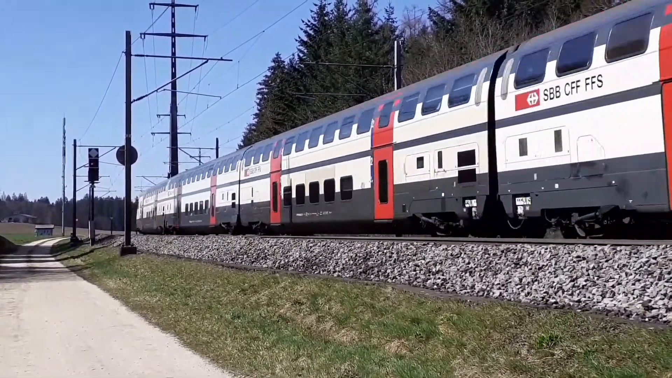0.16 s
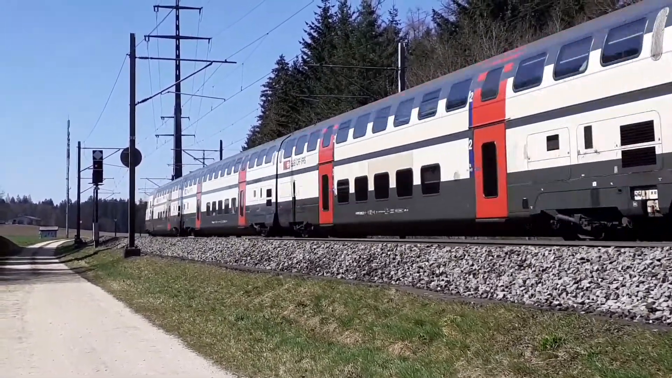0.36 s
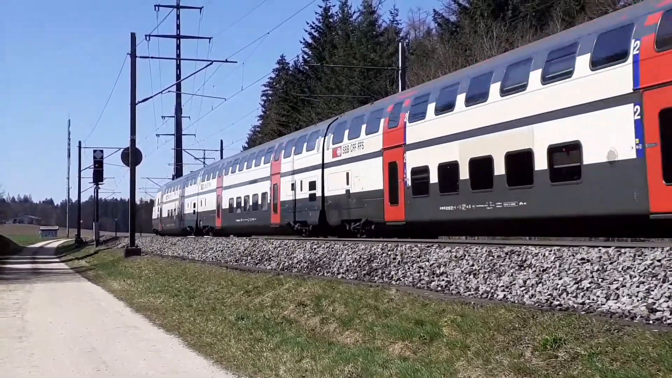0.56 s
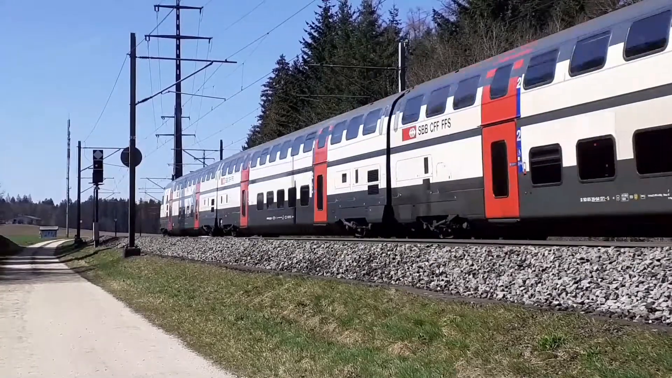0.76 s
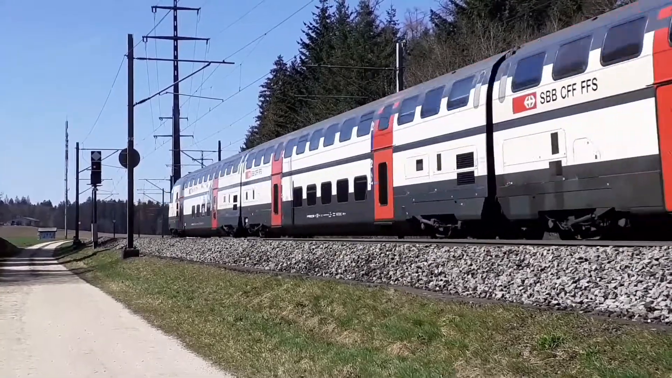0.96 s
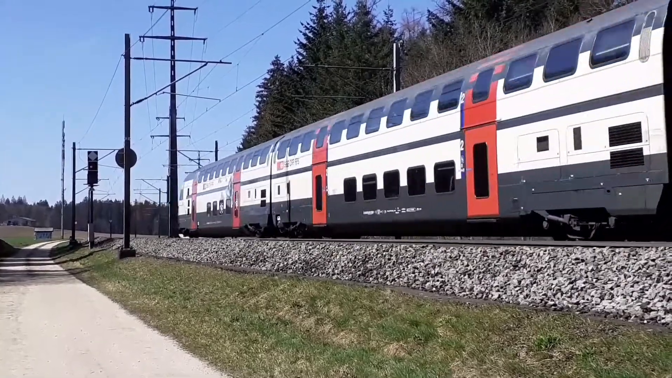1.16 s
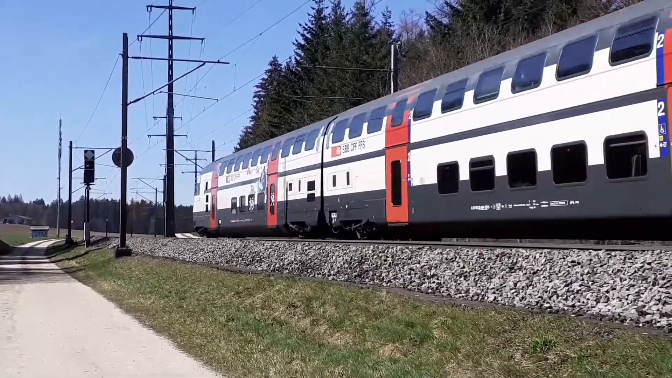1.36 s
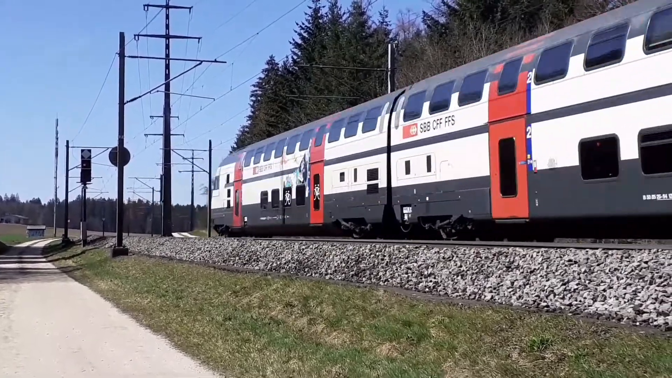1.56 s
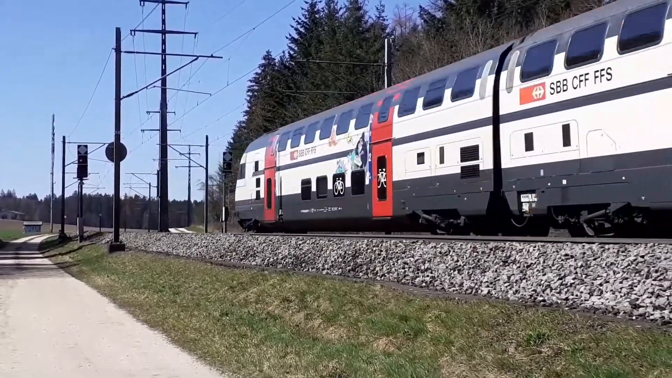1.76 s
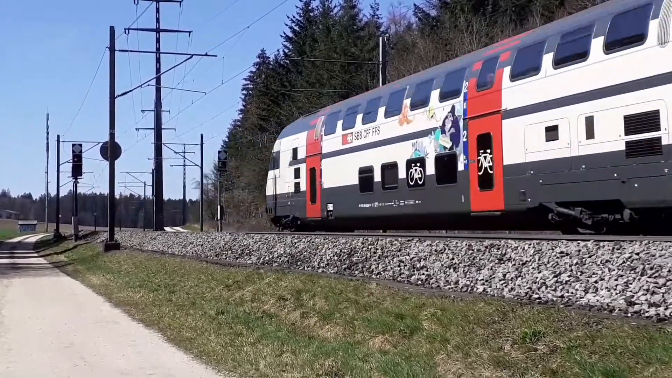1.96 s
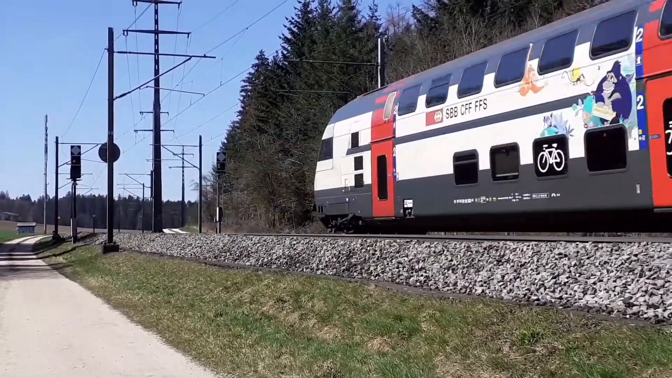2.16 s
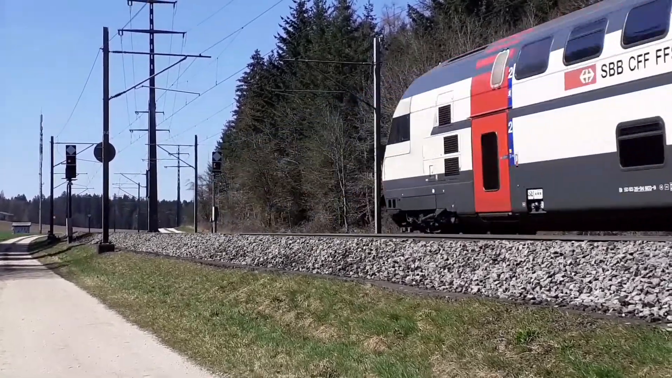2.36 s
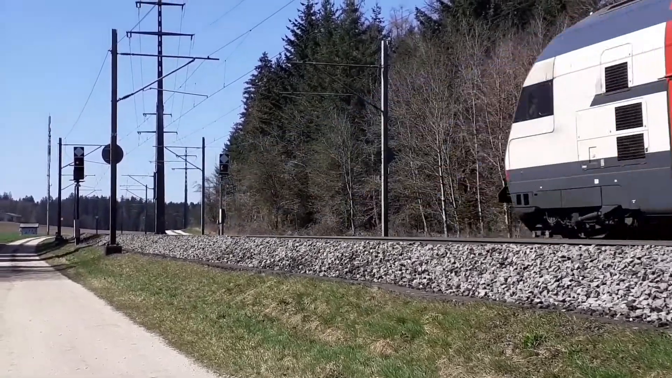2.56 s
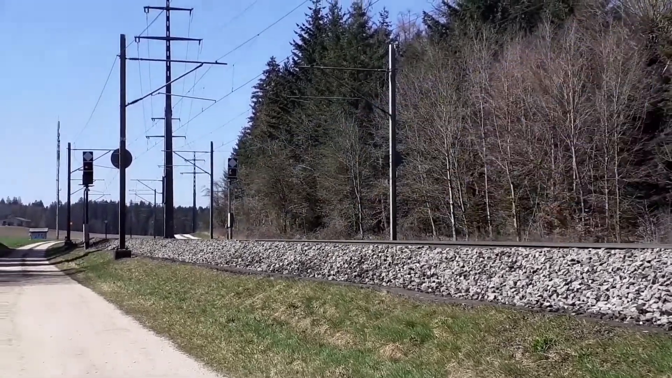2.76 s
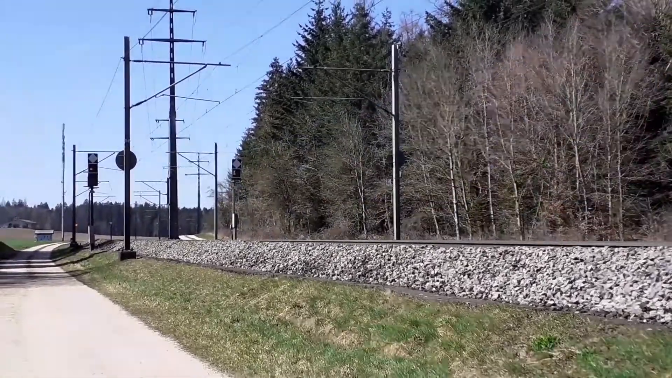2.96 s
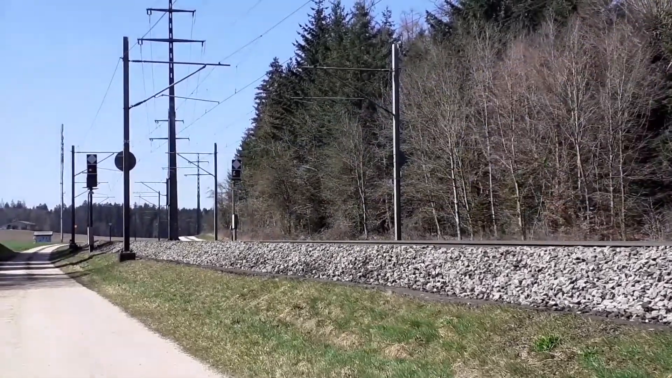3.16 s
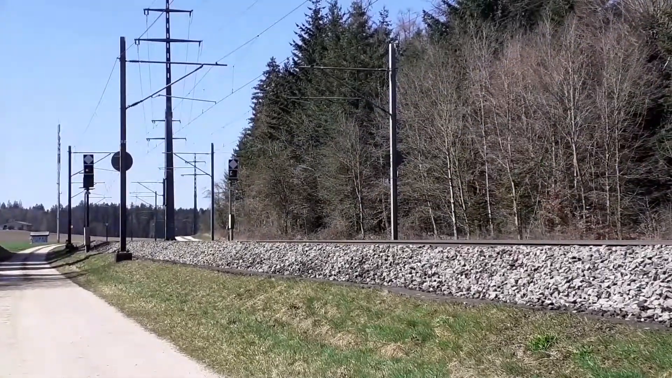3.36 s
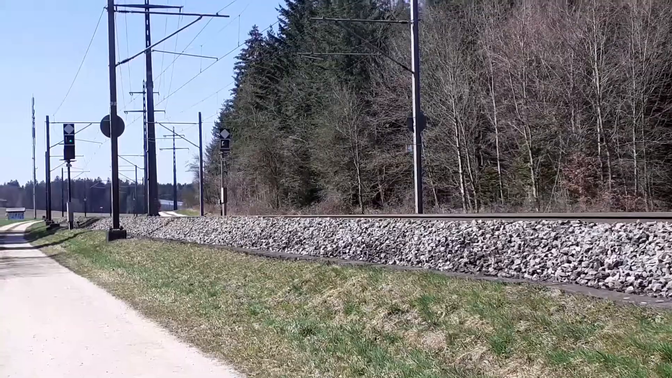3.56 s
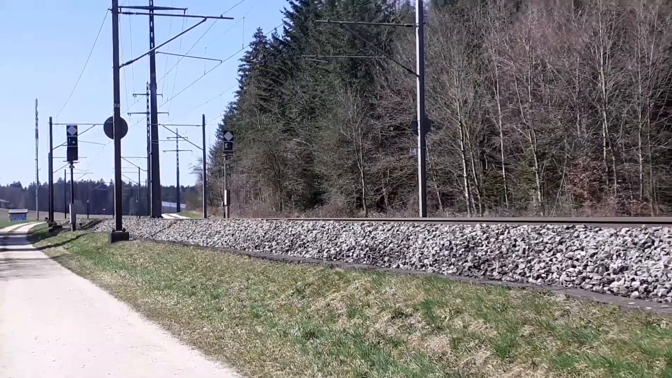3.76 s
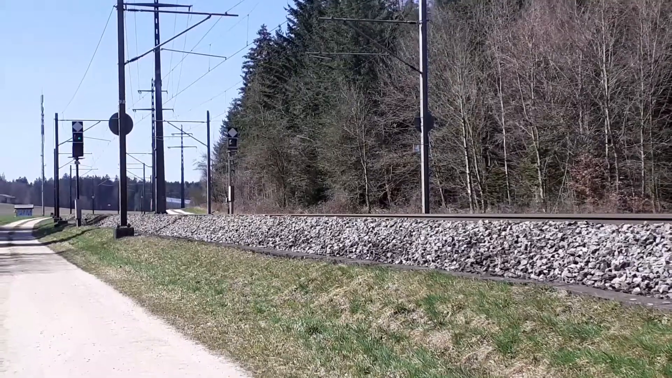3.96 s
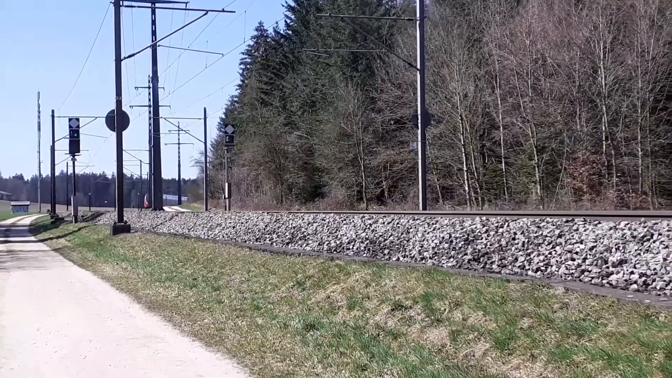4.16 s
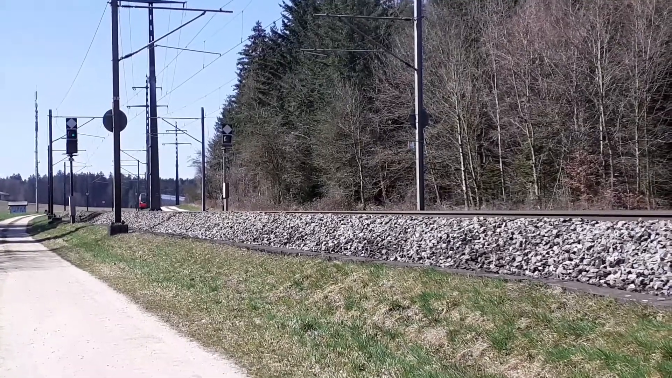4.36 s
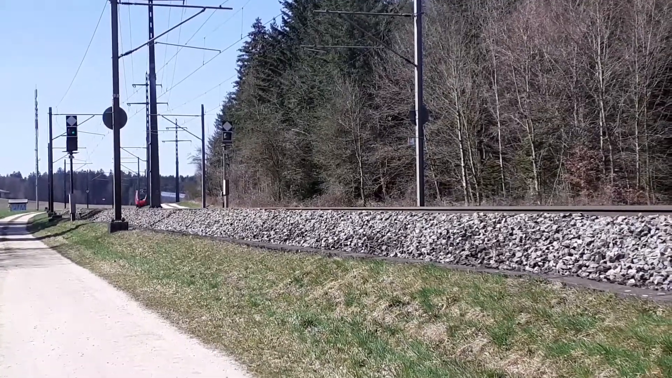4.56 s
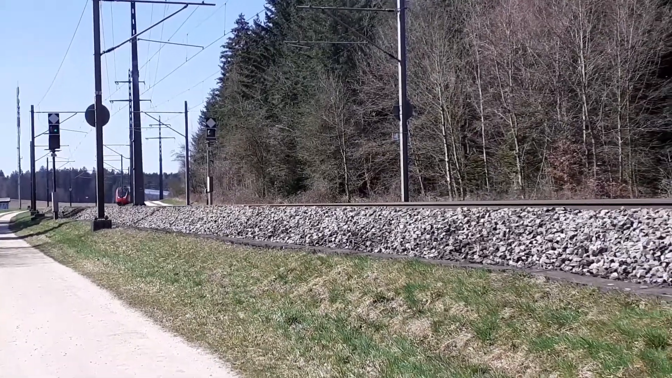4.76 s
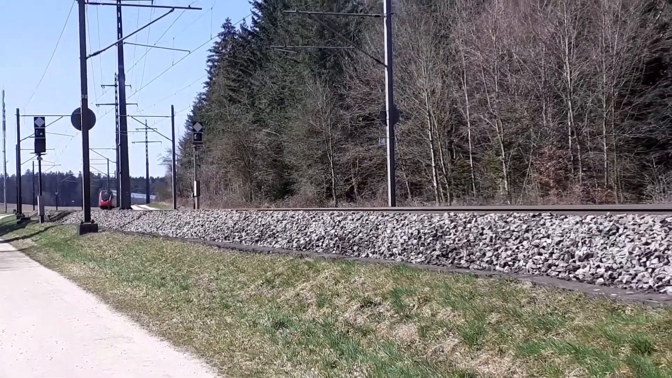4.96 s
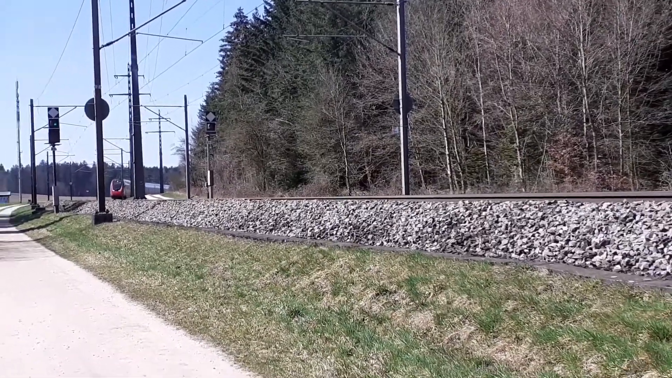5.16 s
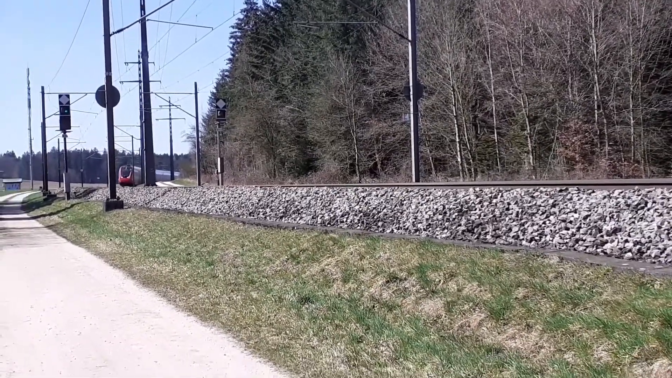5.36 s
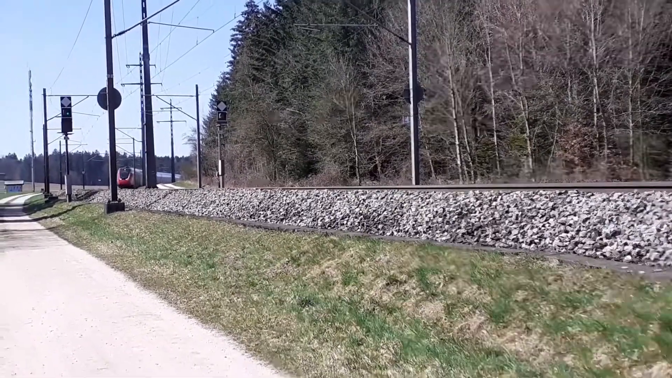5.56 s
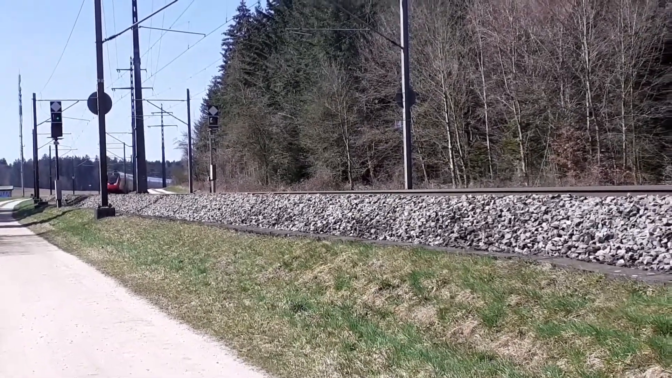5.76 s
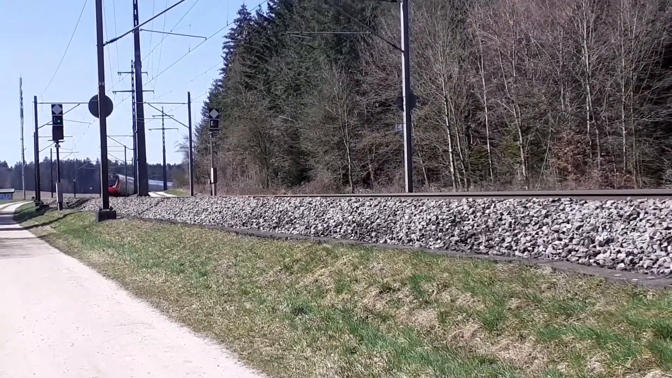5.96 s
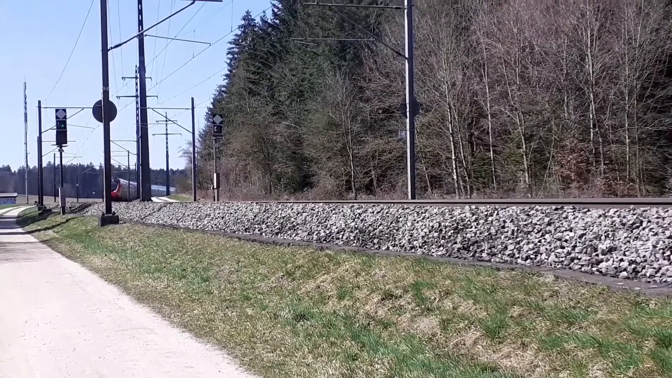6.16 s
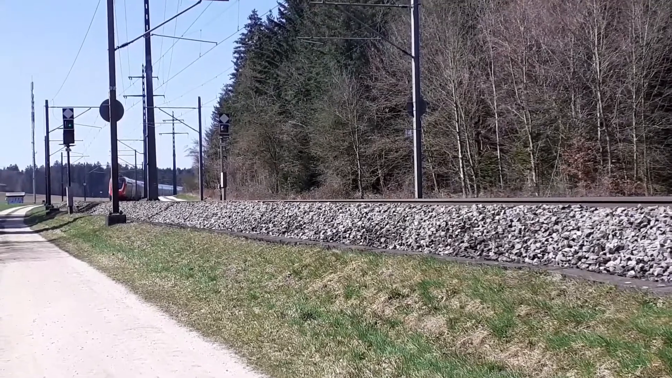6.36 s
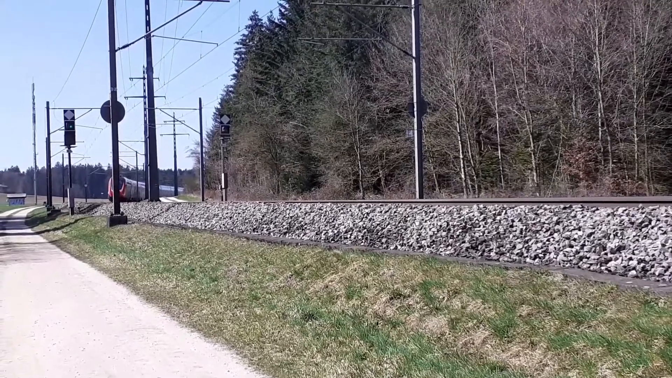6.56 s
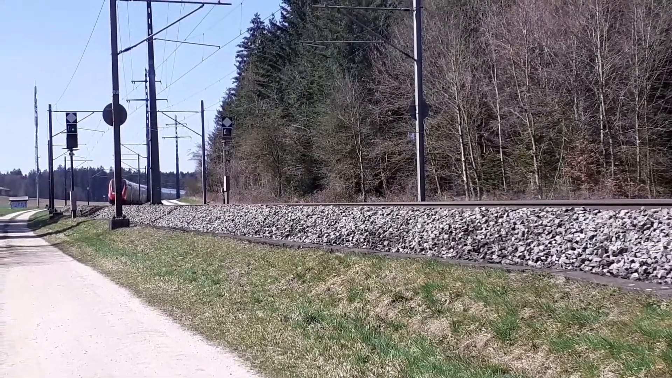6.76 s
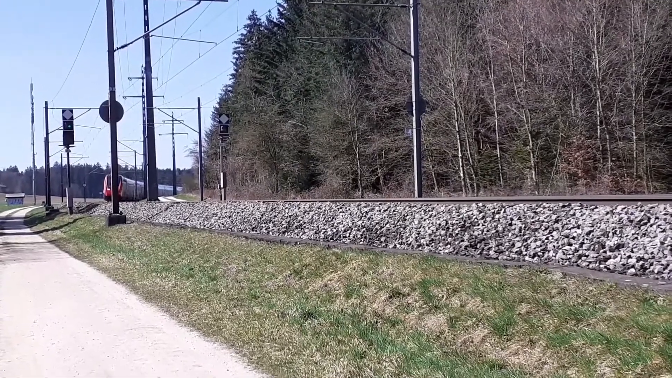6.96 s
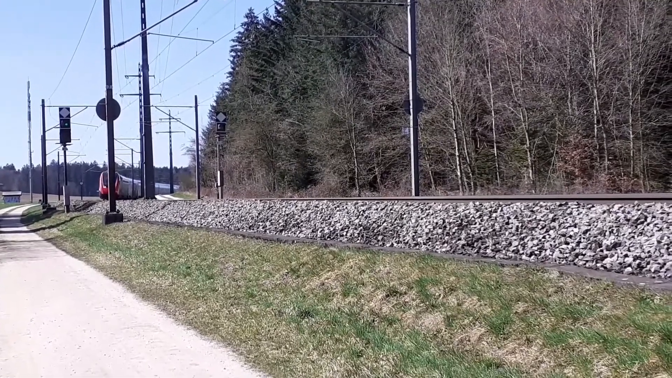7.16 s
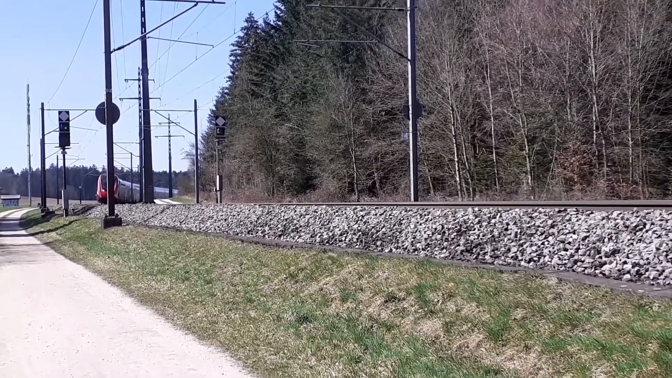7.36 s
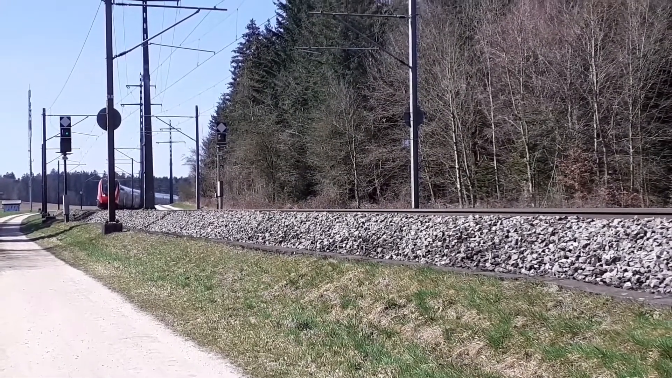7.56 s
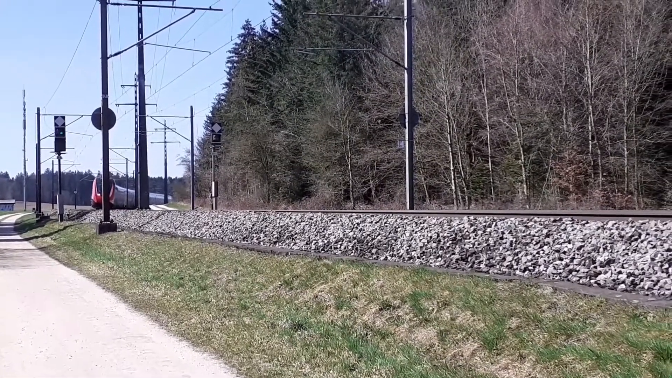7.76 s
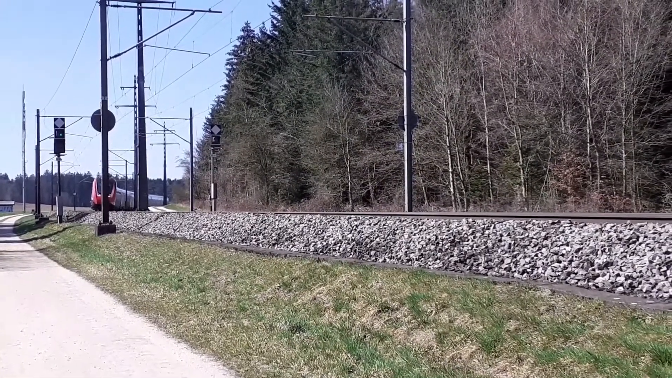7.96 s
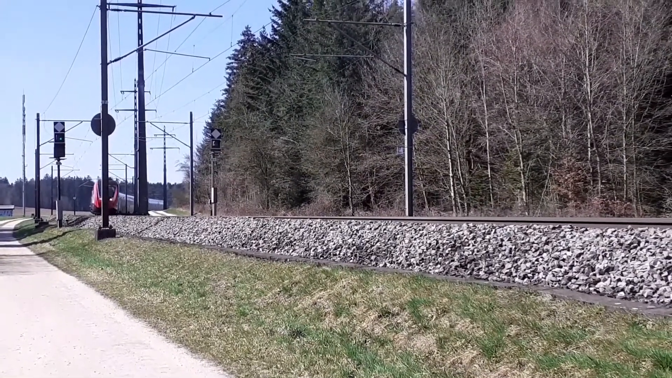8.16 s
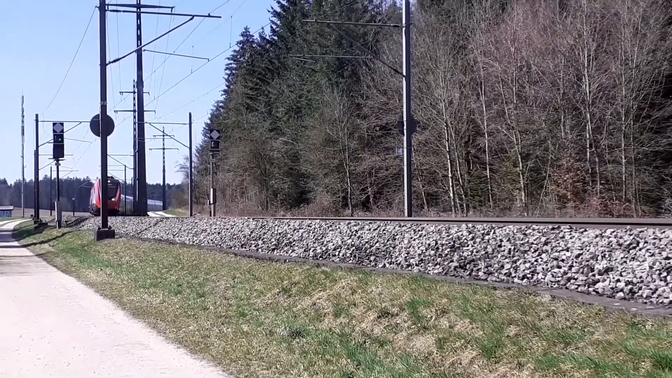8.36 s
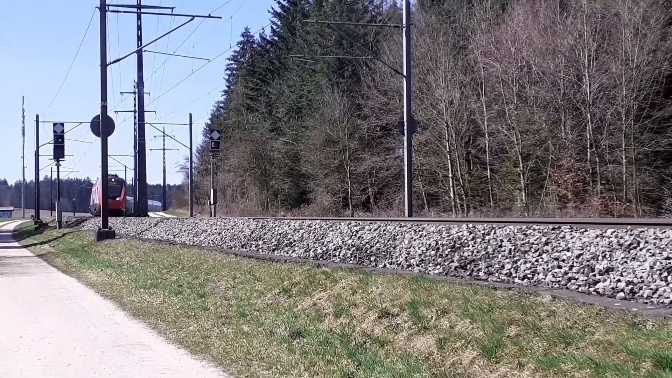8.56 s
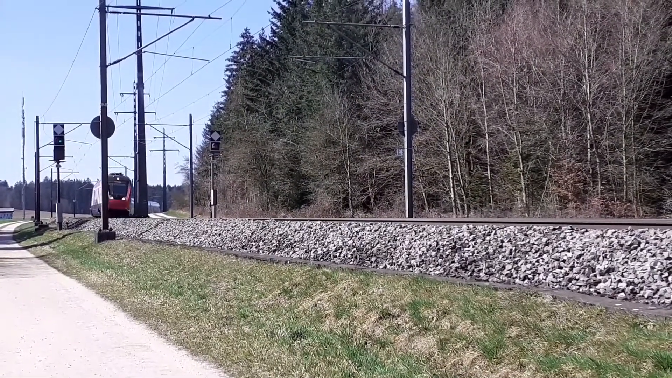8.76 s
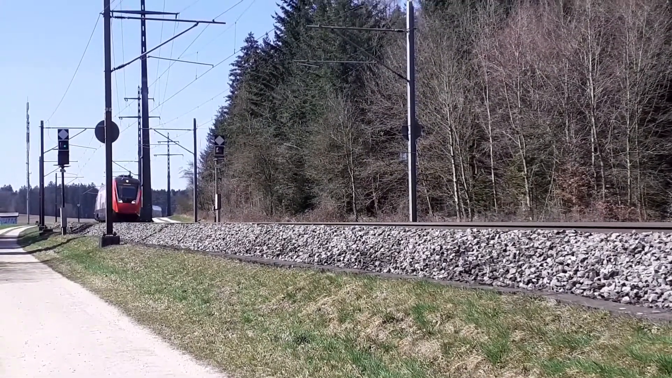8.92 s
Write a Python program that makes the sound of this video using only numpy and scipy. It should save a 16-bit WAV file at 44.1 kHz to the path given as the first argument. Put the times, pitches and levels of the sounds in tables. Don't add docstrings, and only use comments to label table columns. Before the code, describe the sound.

A fast passenger train roars past very close with ringing, squealing wheels, then abruptly cuts to quiet birdsong by a wood while another train slowly grows.

```python
import sys
import numpy as np
from scipy import signal
from scipy.fft import rfft, irfft
from scipy.io import wavfile

SR = 44100
rng = np.random.default_rng(int(sys.argv[2]) if len(sys.argv) > 2 else 0)


def waveform_to_disk(signal):
    frames = np.transpose(np.atleast_2d(signal))
    scaled = np.clip(frames, -1, 1) * 32767
    samples = np.round(scaled).astype(np.int16)
    wavfile.write(sys.argv[1], SR, samples)


def attenuation_scalar(level_db):
    decades = np.asarray(level_db, float) / 20
    return 10 ** decades


N = 400869
PASS_N = int(3.41 * SR)
LEFT_RIGHT = np.array([[1], [-1]])


def in_time(rows):
    s, *columns = np.transpose(rows)
    return [np.interp(np.arange(N) / SR, s, c) for c in columns]


def at_hz(points, hz):
    points = np.array(points)
    return np.interp(np.log(hz), np.log(points[:, 0]), points[:, 1])


def drift(rate_hz, size):
    r = np.exp(-40 * np.pi * rate_hz / SR)
    white = rng.standard_normal(size // 20 + 2002)
    slow = signal.lfilter([1], [1, -2 * r, r * r], white)[1000:]
    return np.interp(np.arange(size) / 20, np.arange(len(slow)), slow / slow.std())


def field(size, spectrum, balance, likeness, splits_hz, levels_db, patchy_db, lag_s):
    ruling_db, lag_wander = 4, .12
    out = np.zeros((2, size))
    edges = 24 * 2 ** np.arange(0, 9.5, 1 / 3)
    centres = np.sqrt(edges[1:] * edges[:-1])
    group = np.searchsorted(splits_hz, centres)
    weight = attenuation_scalar(at_hz(spectrum, centres))
    power = weight ** 2 * np.diff(edges)
    white, together = rng.standard_normal((2, 2, size)), drift(6, size)
    for k, hz in enumerate(centres):
        band = signal.butter(2, edges[k:k + 2], "band", fs=SR, output="sos")
        mid, side = signal.sosfilt(band, white[k % 2])
        share = weight[k] / np.sqrt(np.sum(power[group == group[k]]) * 2 / SR)
        own = drift(12, size)
        unlike = (1 - at_hz(likeness, hz)) * attenuation_scalar(ruling_db * (together - own))
        alike = np.clip(1 - unlike, 0, 1)
        gain = share * attenuation_scalar(levels_db[group[k]] + patchy_db * (0.25 * together + own))
        pair = np.sqrt(.5 + alike / 2) * mid + np.sqrt(.5 - alike / 2) * side * LEFT_RIGHT
        lag = round(lag_s * SR) * (1 + (lag_wander * together if hz < 2500 else 0))
        pair[0] = np.interp(np.arange(size) - lag, np.arange(size), pair[0])
        out += gain * pair * attenuation_scalar(at_hz(balance, hz) / 2 * LEFT_RIGHT)
    return out


def add(out, start, sound, pan_db, lag_s):
    for port, shift, db in zip(out, [round(lag_s * SR), 0], [pan_db / 2, -pan_db / 2]):
        at = np.arange(len(sound)) + start + shift
        inside = (at >= 0) & (at < len(port))
        port[at[inside]] += attenuation_scalar(db) * sound[inside]


def tone(rows, rough, rate_hz):
    s, hz, db = np.transpose(rows)
    start = round(s[0] * SR)
    t = np.arange(start, round(s[-1] * SR)) / SR
    chance = drift(rate_hz, len(t)) + 1j * drift(rate_hz, len(t))
    waver = np.sqrt(1 - rough) + np.sqrt(rough / 2) * chance
    edge = np.clip(np.minimum(t - s[0], s[-1] - t) / 0.0053, 0, 1)
    turn = np.exp(2j * np.pi * np.cumsum(np.interp(t, s, hz)) / SR)
    return start, np.sqrt(2) * edge * attenuation_scalar(np.interp(t, s, db)) * np.real(waver * turn)


def notch(x, hz, width_hz, db):
    bins_hz = np.arange(N // 2 + 1) * SR / N
    return irfft(rfft(x) * attenuation_scalar(db * np.exp(-((bins_hz - hz) / width_hz) ** 4)), N)


def swell(rows, attack_s, release_s):
    power = 0
    for s, long_s, db in rows:
        end = s + long_s
        shape = [(s - 2 * attack_s, -120), (s - attack_s, db - 16), (s, db), (end, db - 5.5),
                 (end + release_s, db - 21.5), (end + 2 * release_s, -120)]
        power = power + attenuation_scalar(2 * in_time(shape)[0])
    return power


def plus(level_db, power, db):
    return 10 * np.log10(attenuation_scalar(2 * level_db) + power * attenuation_scalar(2 * db))


def narrow(power, low_hz, high_hz, pan_db):
    sos = signal.butter(3, [low_hz, high_hz], "band", fs=SR, output="sos")
    band = signal.sosfilt(sos, rng.standard_normal((2, N)))
    level_db = 3.0 + 0.43 * drift(14.0, N) + pan_db / 2 * LEFT_RIGHT
    return band / band.std() * np.sqrt(power) * attenuation_scalar(level_db)


SPEED_MS, DISTANCE_M = 25, 5
LEFT_LAG_S = .00046

# (frequency [Hz], density [dB per Hz])
ROAR_SPECTRUM = [(15, -40), (25, -8.5), (91, 3), (169, -9), (471, -7.5), (1080, -9), (2010, -15.5),
                 (3180, -11.5), (4280, -7.5), (5450, -13.5), (6590, -15), (9350, -25), (11000, -17.5),
                 (13300, -27.5), (15600, -49)]
# (frequency [Hz], left minus right [dB])
PASS_BALANCE = [(60, 1), (150, 0.5), (380, 1), (950, 1.5), (2380, -2.0), (5980, -11.5), (15000, -26.5)]
# (frequency [Hz], likeness [0-1])
PASS_LIKENESS = [(40, .93), (300, .88), (600, .7), (850, .9), (1150, .94), (1500, .8), (2500, .45),
                 (5000, .45), (9000, .25), (15000, .05)]
# (time [s], half width [s], hiss rise [dB], top hiss rise [dB])
RUSHES = [
    (0.05, 0.16, 5, 4.5),
    (.72, 0.36, 8, 6.5),
    (1.5, 0.34, 6, 5),
    (2.4, 0.31, 5, 3.5),
    (3.12, 0.21, 3.5, 5),
]


def roar():
    t = np.arange(PASS_N) / SR
    hiss_db, top_db = sum(np.outer(db, np.exp(-((t - s) / half_s) ** 2)) for s, half_s, *db in RUSHES)
    rumble_db, rail_db = -31.5 + 0.15 * hiss_db, -32 + 0.28 * hiss_db
    return field(PASS_N, ROAR_SPECTRUM, PASS_BALANCE, PASS_LIKENESS, [600, 3000, 7500],
                 [rumble_db, rail_db, -34 + hiss_db, -51 + top_db], patchy_db=1.8, lag_s=LEFT_LAG_S)


def add_ring(out, rows, rough, rate_hz):
    apart = 0.27
    pan_db = at_hz(PASS_BALANCE, rows[0][1])
    add(out, *tone(rows, rough, rate_hz), pan_db + 10 * np.log10(1 - apart), LEFT_LAG_S)
    reflected = rows + [0, 0, 10 * np.log10(apart + 1e-3)]
    add(out[:1], *tone(reflected, 1, rate_hz), pan_db, LEFT_LAG_S)


def doppler(along_m):
    return 1 - SPEED_MS / 343 * along_m / np.hypot(along_m, DISTANCE_M)


# (frequency at rest [Hz], width [Hz], level [dB])
WHEEL_MODES = [(256.6, 30, -44), (472.2, 30, -43), (1600, 320, -39.5), (1978, 78, -44), (2185, 110, -39.5),
               (3600, 52, -45.5), (4360, 170, -36), (6540, 270, -41), (8900, 90, -50.5), (10840, 200, -52),
               (12600, 260, -59.5)]
# (time nearest [s], low modes [dB], high modes [dB])
CAR_ENDS = [
    (0.099, -1, -2.5),
    (.82, 1, -3.5),
    (1.598, -0.5, 0),
    (2.38, -2, -2.5),
    (3.199, 0.5, -8),
]


def wheels():
    out, t = np.zeros((2, PASS_N)), np.linspace(-.5, .5, 31)
    along_m = SPEED_MS * t
    beam = 2.7
    fall_db = -20 * beam * np.log10(np.hypot(along_m, DISTANCE_M) / DISTANCE_M)
    for nearest_s, low_db, high_db in CAR_ENDS:
        for axle_s in [-.2, -.11, 0.13, 0.16]:
            for hz, width_hz, db in WHEEL_MODES:
                broken_db = 4.12 * rng.standard_normal(len(t))
                level_db = db + fall_db + broken_db + (low_db if hz < 3000 else high_db)
                pitch_hz = hz * (1 + .015 * rng.standard_normal()) * doppler(along_m)
                rows = np.transpose([nearest_s + axle_s + t, pitch_hz, level_db])
                add_ring(out, rows, 0.99, width_hz)
    return out


def squeal(s, hz, db, half_s, way_m):
    t = np.linspace(-2, 2, 17) * half_s
    shift = doppler(SPEED_MS * t - way_m)
    return np.transpose([s + t, hz * shift / shift[8], db - 13.5 * np.abs(t) / half_s])


# (time loudest [s], pitch [Hz], level [dB], half length [s], way to nearest point [m])
SQUEALS = [(.55, 4690, -28, 0.06, 11), (.69, 4680, -25.5, 0.055, 12), (.85, 4670, -34, 0.13, 12.5),
           (1.0, 4650, -25.5, 0.066, 12), (1.25, 4570, -24, 0.081, 8.5), (1.45, 4300, -20.5, 0.093, 3.5),
           (1.57, 4190, -16.5, 0.084, -3.5), (1.69, 4130, -17.5, 0.068, -9), (1.79, 4100, -37, 0.05, -7.5),
           (1.96, 4600, -27.5, .09, 12), (2.17, 4560, -31.5, 0.074, 7), (2.274, 2132, -25, .04, 3.5),
           (2.4, 2090, -27.5, 0.11, -6.5), (2.575, 4115, -27, 0.026, -3.5),
           (3.182, 4170, -19.5, 0.035, -2.5), (3.271, 4170, -26.5, .03, -6.5),
           (3.32, 4130, -30.5, .025, -1), (3.05, 4310, -31, .06, 6), (2.52, 4650, -32, .04, 11),
           (2.85, 4550, -33, .05, 9), (2.68, 4060, -33, .04, -9), (.25, 4120, -30, .04, -8),
           (.05, 4300, -31, .05, 4)]
# (time loudest [s], pitch [Hz], level [dB], half length [s], way to nearest point [m])
SHRILL = [(0.159, 6350, -28.5, .12, 2), (.75, 10800, -49, .08, 1), (0.824, 7940, -26, .025, 9.5),
          (.98, 12800, -49, .07, 3), (1.155, 11300, -48, .06, 2.5), (1.368, 11000, -39.5, .05, 4.5),
          (1.416, 6450, -34.5, .07, 3), (1.652, 8300, -37, .04, 2.5), (1.78, 12600, -48, .08, -8),
          (2.315, 6340, -25.5, .08, 1), (2.471, 6200, -24.5, .08, -3.5), (2.996, 6550, -35.5, .06, 0.5),
          (3.14, 6430, -29.5, .04, 2), (3.29, 6187, -23, .09, -5), (3.093, 10650, -39.5, .06, 1),
          (3.179, 10620, -38, .1, 2), (3.25, 8330, -42, .1, 2.5), (.62, 7750, -36, .03, 9),
          (.96, 7700, -38, .015, 9), (1.77, 6250, -33, .04, -7), (2.17, 6600, -37, .04, 6),
          (2.585, 6220, -32, .025, 0), (2.93, 6720, -39, .03, 3), (2.33, 8420, -40, .04, 6),
          (2.65, 10400, -46, .06, -4), (2.42, 10800, -46, .05, 4)]
# (time loudest [s], pitch [Hz], level [dB], half length [s], way to nearest point [m])
CHORUS = [(.08, 2090, -28, .12, 10.5), (.64, 4240, -27, .1, 10), (.85, 4210, -28.5, .15, 11.5),
          (1.04, 4200, -26.5, .08, -4.5), (.85, 2100, -30, .12, 6), (2.55, 2050, -31.5, .08, -6),
          (3.14, 2000, -27, .06, -6.5), (3.25, 1900, -28.5, .07, -4.5), (3.251, 1580, -28.5, 0.12, -5),
          (2.22, 4400, -38, 0.11, 6), (0.54, 6300, -42, 0.093, 7), (1.03, 6350, -38, 0.11, 8),
          (2.1, 6250, -40, 0.06, -6), (.38, 4600, -34, .15, 14), (.3, 4180, -33, .15, -12),
          (.2, 10700, -50, .2, 10), (.8, 10750, -48, .25, 10), (1.8, 10600, -48, .15, -9),
          (2.47, 4200, -30, .08, -6), (2.92, 4420, -34, .1, 7), (1.6, 6200, -35, .1, -6),
          (1.67, 2100, -29, .08, 4)]


def squeals():
    out = np.zeros((2, PASS_N))
    for table, rough, rate_hz in [(SQUEALS, .5, 45), (SHRILL, .5, 45), (CHORUS, 1, 130)]:
        for row in table:
            add_ring(out, squeal(*row), rough, rate_hz)
    return out


def passing():
    return np.pad(roar() + wheels() + squeals(), ((0, 0), (0, N - PASS_N)))


# (time [s], level [dB])
APPROACH = [(3.42, -0.5), (4.5, 1.64), (5.6, 3.5), (6.6, 4.5), (7.3, 8.5), (8.0, 11.5), (9.09, 15.5)]


def approach_db():
    return in_time(APPROACH)[0]


# (time [s], length [s], level [dB])
ROAD_SWELLS = [
    (4.686, .62, -60),
    (5.726, 0.066, -62.5),
]


def road_power():
    return swell(ROAD_SWELLS, attack_s=.06, release_s=0.18)


# (frequency [Hz], density [dB per Hz])
FAR_SPECTRUM = [(15, -50), (25, -18), (46, 0), (80, 14), (99, -7.5), (119, -15), (260, -21), (458, -26.5),
                (686, -23.5), (1860, -26), (6590, -38), (7540, -31), (9350, -52.5), (12200, -31.5),
                (15600, -42.5)]
# (frequency [Hz], left minus right [dB])
FAR_BALANCE = [(60, 2), (180, 2.5), (550, 2.5), (1650, -0.5), (4970, -4.5), (15000, -2)]
# (frequency [Hz], likeness [0-1])
FAR_LIKENESS = [(60, 0.8), (180, 0.78), (550, 0.58), (1650, 0.16), (4970, 0.4), (15000, 0.48)]
# (time [s], level [dB])
WIND = [(3.42, -59), (4.33, -60), (4.84, -62), (5.16, -57), (6.92, -55), (7.31, -49), (7.98, -49),
        (8.19, -44), (8.49, -50), (9.09, -45.5)]
# (time [s], length [s], level [dB])
BREEZES = [
    (4.46, .1, -67),
    (7.2, .1, -70.5),
    (7.78, .25, -64.5),
]
# (time [s], share [0-1])
DIP_GROWS = [
    (4.4, .35),
    (5.2, .85),
    (7, 1),
]


def wind_and_far_train():
    start = int(3.3 * SR)
    (wind_db,), (dip,) = in_time(WIND), in_time(DIP_GROWS)
    near_db, road = approach_db(), road_power()
    low_db = plus(-63.5 + near_db, road, 3.5)
    high_db = plus(-65.5 + 1.105 * near_db, road, 3)
    air_db = plus(-70.5 + 0.29 * near_db, swell(BREEZES, .15, .3), 0)
    between_db = 0.61 * high_db + 0.45 * air_db + 3.0
    levels_db = np.array([wind_db + 3.0, low_db, high_db, between_db, air_db])[:, start:]
    far = field(N - start, FAR_SPECTRUM, FAR_BALANCE, FAR_LIKENESS, [135, 900, 2300, 5800],
                levels_db, patchy_db=1.12, lag_s=-0.000067)
    far = np.pad(far, ((0, 0), (start, 0)))
    return (1 - dip) * far + dip * notch(far, hz=9050, width_hz=1000, db=-14)


# (time [s], peak level [dB])
LOW_NOTES = [(3.4158, -53), (3.707, -51.5), (3.9948, -49.5), (4.29, -47.5), (4.577, -47.5), (4.8773, -49),
             (7.8285, -55), (8.101, -44.5), (8.394, -43), (8.6845, -45.5), (8.963, -44.5)]
# (time [s], peak level [dB])
HIGH_NOTES = [(3.4982, -50.5), (3.7847, -48), (4.0764, -46), (4.3722, -45), (4.658, -45.5), (4.9626, -46.5),
              (7.9104, -46.5), (8.1834, -41), (8.478, -43), (8.7614, -42.5), (9.0464, -44.5)]
# (time after onset [s], pitch [Hz], level [dB])
LOW_SHAPE = [(-.026, 4150, -36), (-.017, 3850, -14), (-.011, 3900, -30), (-.007, 4650, -11),
             (-.001, 4200, -12), (.004, 4120, 0), (.045, 4090, -3), (.065, 4080, -9), (.075, 4070, -40)]
# (time after onset [s], pitch [Hz], level [dB])
HIGH_SHAPE = [(-.004, 5700, -28), (0, 5400, -16), (.003, 5000, -10), (.007, 4620, -4), (.015, 4430, -2),
              (.028, 4330, -4), (.045, 4285, -7), (.075, 4300, -10), (.09, 4300, -40)]


def two_note_song():
    song = np.zeros((2, N))
    for notes, shape in [(LOW_NOTES, LOW_SHAPE), (HIGH_NOTES, HIGH_SHAPE)]:
        for s, db in notes:
            detune = 1 + 0.0029 * rng.standard_normal()
            rows = np.array(shape) * [1, detune, 1] + [s, 0, db - 2.5]
            add(song, *tone(rows, .42, 50), pan_db=-1.5, lag_s=0)
    return song


# (time loudest [s], pitch [Hz], level [dB], rise [s], climb [Hz])
CHIRPS = [(3.752, 2670, -54, 0.076, 220), (3.74, 3250, -59, .045, 120), (3.67, 3100, -65, .015, 0),
          (3.766, 2750, -56, .006, 200), (4.43, 3050, -62, .01, 150), (4.46, 3450, -63, .01, 50),
          (3.769, 3050, -50, 0.009, 450), (4.371, 2620, -53, .045, 260), (4.31, 2300, -68, .03, 20),
          (4.4, 3050, -47, .025, 380), (4.998, 2750, -55, .016, 400), (4.69, 2750, -62, .025, 0),
          (5.15, 1390, -60, .04, -30), (5.257, 2700, -60, .01, 0), (5.091, 2750, -55, .012, 300),
          (5.22, 2700, -54, .012, 201), (5.245, 4400, -58, .028, -150), (5.673, 2630, -52.5, 0.011, 180),
          (5.756, 2640, -57, .012, 200), (5.84, 3185, -60, 0.021, 6), (5.859, 2560, -54, 0.017, 200.5),
          (5.6, 4000, -70, .025, -1300), (5.94, 3900, -72, .025, -1300), (4.9, 3000, -64, .012, 100),
          (6.25, 4400, -67, .007, -700), (6.268, 4550, -64, .014, 150), (6.285, 4330, -68, .008, -100)]
# (time [s], peak level [dB])
RASPS = [
    (4.666, -61),
    (5.0512, -55),
    (5.6261, -62),
    (5.7227, -53.5),
    (5.8222, -54),
]


def near_chirps():
    chirps = np.zeros((2, N))
    for s, hz, db, rise_s, climb_hz in CHIRPS:
        rows = [(s - rise_s, hz - climb_hz, db - 12), (s, hz, db), (s + 0.023, hz + 0.2 * climb_hz, db - 20)]
        add(chirps, *tone(rows, .35, 80), pan_db=3, lag_s=0)
    for s, db in RASPS:
        rows = [(s - .004, 3300, db - 12), (s + 0.0042, 3000, db - 6), (s + 0.01644, 2700, db - 10)]
        add(chirps, *tone(rows, 1, 460), pan_db=13.0, lag_s=0)
    return chirps


def birds():
    t60_s, song_wood_db, chirp_wood_db = .55, -.5, -14
    song, chirps = two_note_song(), near_chirps()
    t = np.arange(int(.6 * SR)) / SR
    trees = rng.standard_normal((2, len(t))) * attenuation_scalar(-60 * t / t60_s) * np.clip(t / .04, 0, 1)
    trees = trees / np.sqrt(np.sum(trees ** 2, axis=1, keepdims=True))
    sent = attenuation_scalar(song_wood_db) * song + attenuation_scalar(chirp_wood_db) * chirps
    return song + chirps + signal.fftconvolve(sent, trees, axes=1)[:, :N]


# (time [s], length [s], level [dB])
RUSTLES = [
    (3.75, 0.06, -71),
    (3.89, .03, -73),
]


def leaves():
    return narrow(swell(RUSTLES, .04, .05), 6970, 8050, pan_db=-5)


# (time [s], peak level [dB], pitch [Hz], left minus right [dB])
GUSTS = [
    (3.77, -48, 63, 9),
    (4.09, -51, 84, 8),
    (4.339, -45, 70, 12),
    (5.1, -42.5, 77.4, 10),
    (6.222, -38.5, 95.2, -15),
    (7.78, -39, 76, 0),
    (8.2, -41, 105, 0),
]


def gusts():
    out, rise_s, fall_s, puff_hz = np.zeros((2, N)), .025, .05, 160
    for s, db, hz, pan_db in GUSTS:
        thump = [(s - rise_s, hz, db - 14), (s, hz, db), (s + fall_s, .7 * hz, db - 14)]
        add(out, *tone(thump, .15, 36), pan_db, lag_s=0)
        puff_db = db - 9
        puff = [(s - rise_s, puff_hz, puff_db - 11), (s, puff_hz, puff_db), (s + rise_s, puff_hz, puff_db - 23)]
        add(out, *tone(puff, 0.95, 75.0), pan_db, lag_s=0)
    return out


def road():
    return narrow(road_power(), 1210, 1490, pan_db=7.5)


# (time [s], length [s], level [dB])
PINGS = [
    (4.7, 0.032, -79),
]


def singing_rail():
    from_s = 6
    waking_db, = in_time([(from_s - .6, -12), (from_s + 0.23, 0)])
    power = attenuation_scalar(2 * (-83.5 + 0.58 * approach_db() + waking_db)) + swell(PINGS, .15, .15)
    return narrow(power, 7220, 7780, pan_db=-16.5)


# (time [s], peak level [dB])
SNAPS = [
    (6.1464, -36),
]


def snaps():
    out, t = np.zeros((2, N)), np.arange(int(.006 * SR)) / SR
    modes = np.cos(2 * np.pi * 3000 * t) + .3 * np.cos(2 * np.pi * 1300 * t)
    snap = np.exp(-t / 0.00069) * (modes + .35 * rng.standard_normal(len(t)))
    snap = signal.sosfilt(signal.butter(3, 9000, fs=SR, output="sos"), snap)
    for s, db in SNAPS:
        add(out, round(s * SR), attenuation_scalar(db - 0.5) * snap, pan_db=-1.5, lag_s=0)
    return out


def quiet_line():
    return wind_and_far_train() + birds() + leaves() + gusts() + road() + singing_rail() + snaps()


def scene():
    cut_s, gap_s, resume_s = 3.378, 3.396, 3.411
    passing_db, = in_time([(3.33, 0), (cut_s, -2.5), (cut_s + .003, -53), (gap_s, -65), (gap_s + .003, -95)])
    quiet_db, = in_time([(resume_s - .012, -90), (resume_s - .005, -63), (resume_s, 0)])
    return attenuation_scalar(passing_db) * passing() + attenuation_scalar(quiet_db) * quiet_line()


def roll_off(x):
    return signal.sosfilt(signal.butter(12, 15740, fs=SR, output="sos"), x)


def record(dry):
    low_cut = signal.butter(3, 42, "high", fs=SR, output="sos")
    heard = signal.sosfilt(low_cut, notch(dry, hz=9250, width_hz=750, db=-8))
    return roll_off(heard)


dry = scene()
out = record(dry)
waveform_to_disk(out)
```